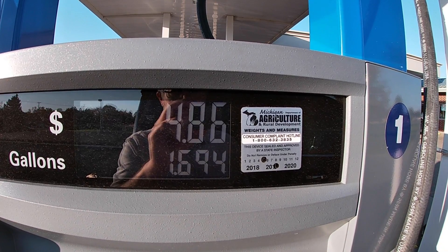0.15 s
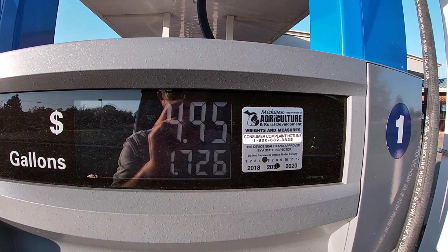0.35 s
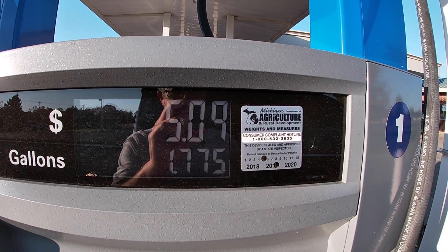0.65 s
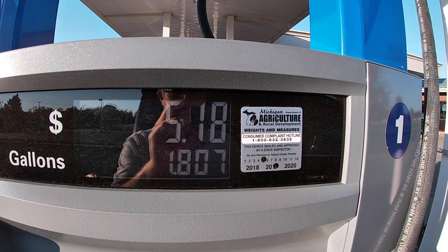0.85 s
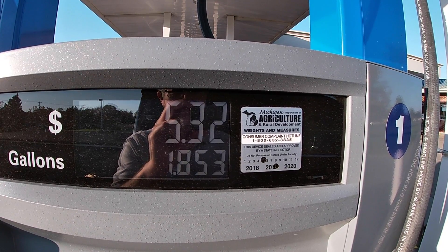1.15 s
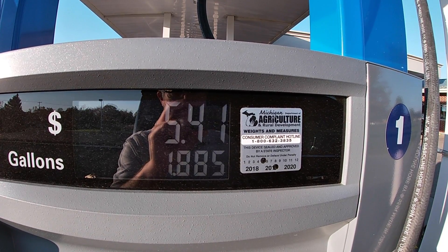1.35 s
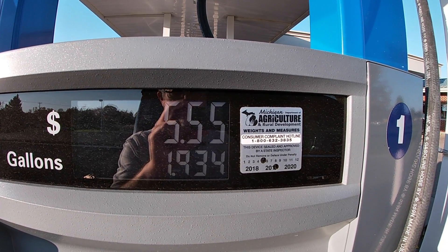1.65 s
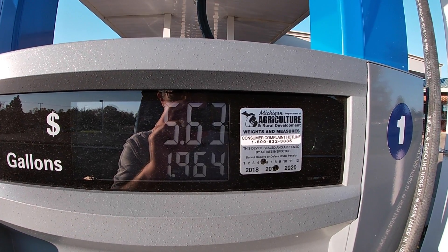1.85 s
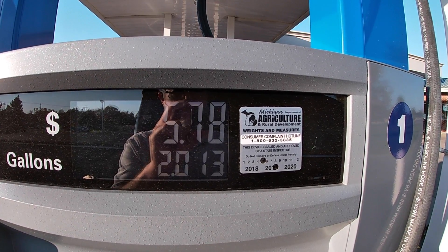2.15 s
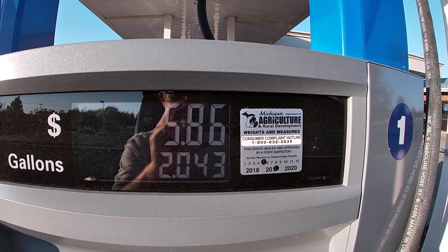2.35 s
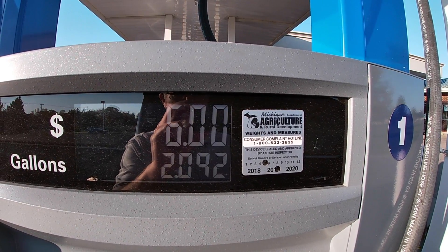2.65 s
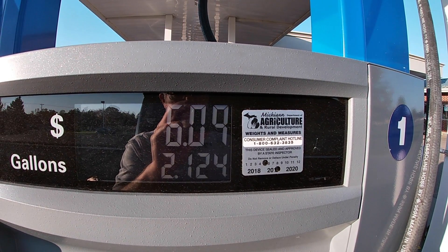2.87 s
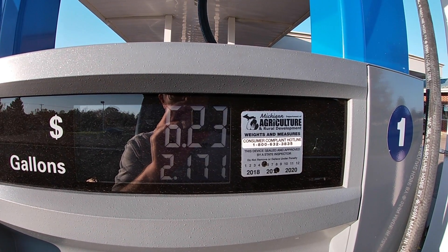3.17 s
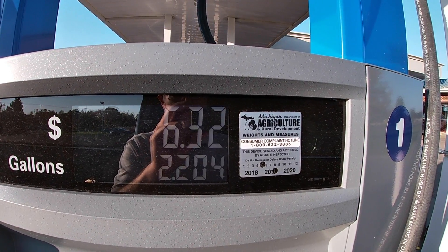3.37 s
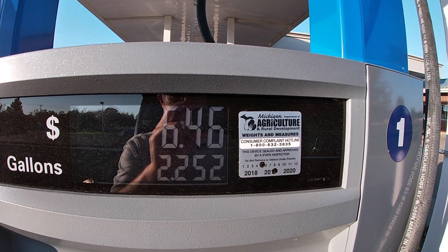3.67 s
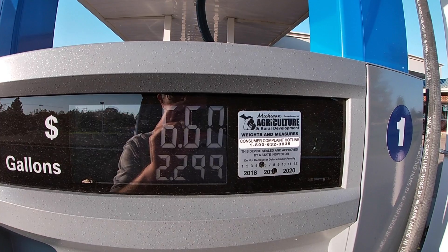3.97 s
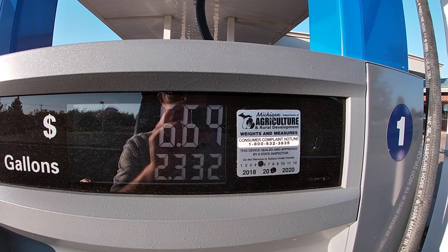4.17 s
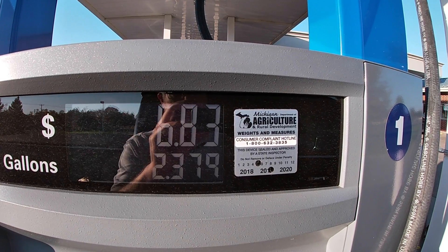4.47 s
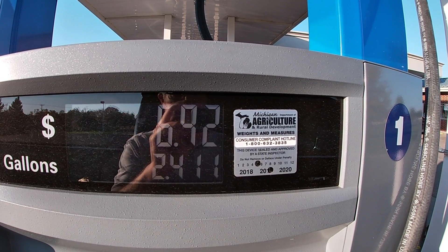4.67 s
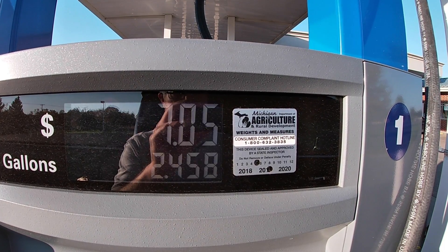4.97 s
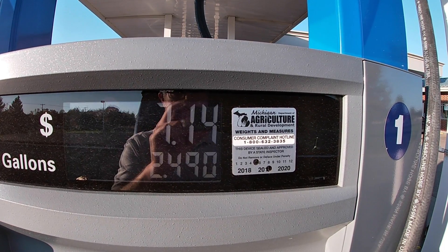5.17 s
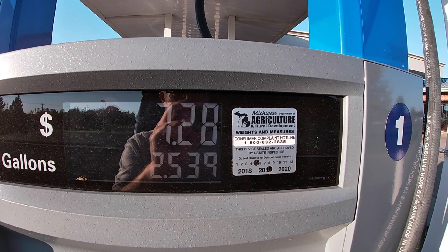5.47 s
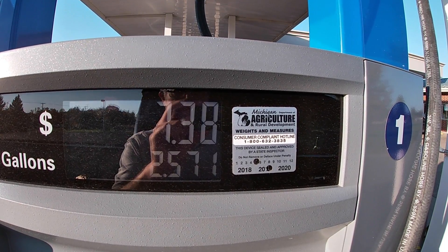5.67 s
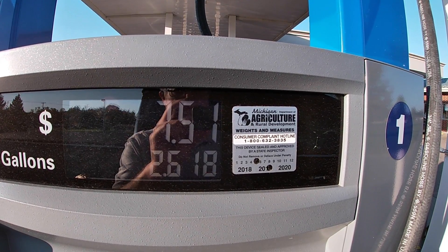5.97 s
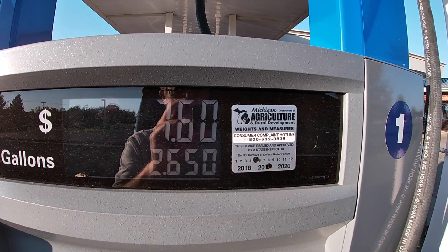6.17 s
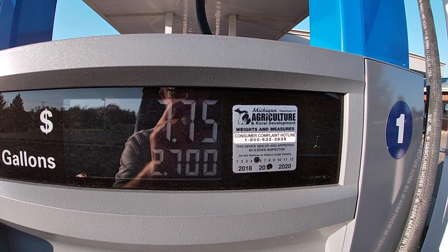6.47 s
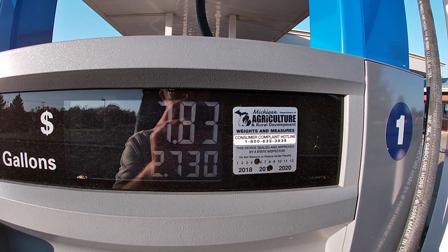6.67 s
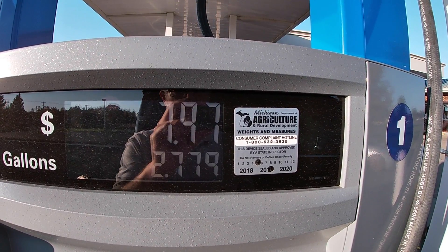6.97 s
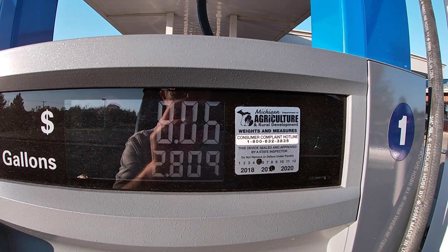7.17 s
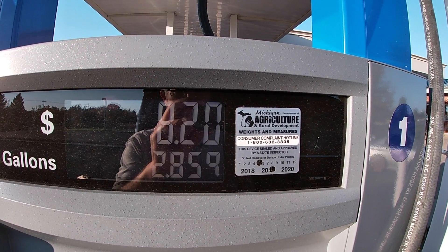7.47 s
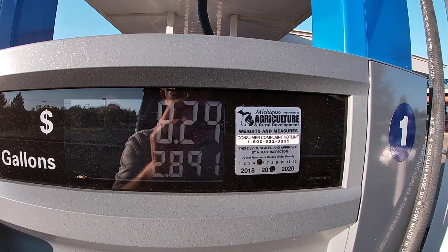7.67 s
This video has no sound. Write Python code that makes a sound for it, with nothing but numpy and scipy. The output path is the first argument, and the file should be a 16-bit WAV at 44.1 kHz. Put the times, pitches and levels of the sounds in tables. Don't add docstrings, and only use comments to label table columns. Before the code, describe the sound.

Outdoors at a filling station, a phone beside the pump picks up a deep, boomy engine hum that drops in pitch and turns lumpy as a big truck rolls closer. Road rumble and short gliding car hums sit behind it, with a low pump drone and soft fuel hiss. Dull knocks punctuate; a brief rev comes past the middle, and faint squeals and ticking valves arrive near the end.

```python
import sys
import numpy as np
from scipy import signal
from scipy.fft import rfft, irfft, next_fast_len
from scipy.io import wavfile
from scipy.ndimage import uniform_filter1d, minimum_filter1d

SR = 44100
rng = np.random.default_rng(int(sys.argv[2]) if len(sys.argv) > 2 else 0)


def amplitude_ratio(level_db):
    exponent = np.asarray(level_db, float) / 20
    return 10 ** exponent


def bounce(signal):
    frames = np.transpose(np.atleast_2d(signal))
    limited = np.clip(frames, -1, 1)
    pcm = np.round(limited * 32767).astype(np.int16)
    wavfile.write(sys.argv[1], SR, pcm)


N = 344844
ARRIVES_S = 7.8
LEVEL_S = 7.1
# t/s, level of background noise/dB (held down at first while the engine hum is loud), level of
# tyres passing close/dB
TRAFFIC = [(0, -3, -51), (.55, -4.5, -51), (.86, -4, -50.5), (1.03, -4, -45.5), (1.4, 0, -44),
           (1.7, -.5, -45.5), (2.1, 1.5, -43), (2.6, 1, -46.5), (3.2, -0.2, -46), (3.95, 1.9, -46.5),
           (4.15, -1.3, -45.5), (4.7, 0.9, -46.5), (5.05, 1, -48), (5.9, -1.8, -48), (6.6, -0.5, -47.5),
           (7.1, -0.3, -45.5), (7.5, 0.5, -42), (7.82, 1.5, -39)]


def level(x):
    return x / np.sqrt(np.mean(x ** 2))


def play(table):
    s, *columns = np.transpose(table)
    t = np.arange(N) / SR
    gate = np.clip(np.minimum(t - s[0] + .05, s[-1] + .05 - t) / .05, 0, 1)
    return gate, *(np.interp(t, s, c) for c in columns)


def walk(rate, size=N):
    k = int(SR / rate)
    held = np.repeat(rng.standard_normal(size // k + 2), 8)
    steps = uniform_filter1d(uniform_filter1d(held, size=8), size=8)
    return np.interp(np.arange(size) * 8 / k, np.arange(len(steps)), level(steps - steps.mean()))


def growth(far_db, gain_db, lateness, until=ARRIVES_S):
    return far_db + gain_db * np.minimum(np.arange(N) / SR / until, 1) ** lateness


def bumps(table):
    t = np.arange(N) / SR
    return sum(db * np.exp(-(2 * (t - s) / length) ** 2) for s, length, db in table)


def swell(voice, s, length, hz, glide, db, **kind):
    out, t = np.zeros(N), np.arange(N) / SR - s
    on = abs(t) < length
    fade_db = 10.5 * (2 * t[on] / length) ** 2
    out[on] = voice(hz + glide * t[on], db - fade_db, **kind)
    return out


def tone(hz, db, wobble, flutter_db, rate):
    pitch, strength = walk(rate)[:len(hz)], walk(rate)[:len(hz)]
    phase = 2 * np.pi * (np.cumsum(hz * (1 + wobble * pitch)) / SR + rng.random())
    return np.sqrt(2) * amplitude_ratio(db + flutter_db * strength) * np.sin(phase)


def whistle(hz, db, clean):
    phase = 2 * np.pi * np.cumsum(hz) / SR
    rate = .055 * hz.mean()
    in_phase = clean + walk(rate)[:len(hz)]
    return amplitude_ratio(db) * (in_phase * np.sin(phase) + walk(rate)[:len(hz)] * np.cos(phase))


def wash(spectrum, low_hz, high_hz, flicker_db, rate):
    size = next_fast_len(N)
    hz = np.arange(1, size // 2 + 2) * SR / size
    points = np.array(spectrum)
    gain = amplitude_ratio(np.interp(np.log(hz), np.log(points[:, 0]), points[:, 1], left=-90, right=-90))
    gain = gain / np.sqrt((1 + (low_hz / hz) ** 6) * (1 + (hz / high_hz) ** 6))
    noise = gain * rfft(rng.standard_normal(size))
    octaves = np.arange(np.floor(np.log2(points[0, 0])), np.log2(points[-1, 0]) + 1)
    share = [np.clip(1 - abs(np.log2(hz) - k), 0, 1) for k in octaves]
    return level(sum(amplitude_ratio(flicker_db * walk(rate)) * irfft(noise * w, size)[:N] for w in share))


def road():
    # f/Hz, level per Hz/dB
    rumble = [(12, -35), (22, -13), (43, -2), (65, 1), (82, -9), (100, -7), (138, -5.5), (175, -2.5),
              (215, -14.5), (252, -23.5), (310, -15.5), (400, -34.5), (520, -57)]
    roar = [(120, -31), (200, -2.5), (237, -3.5), (331, -16), (420, -14), (528, -17), (802, -16.5),
            (1140, -18.5), (1380, -22.5), (3500, -38), (4550, -72), (7700, -120)]
    _, flow_db, tyres_db = play(TRAFFIC)
    low = amplitude_ratio(1.24 * flow_db - 26.5) * wash(rumble, low_hz=36, high_hz=287, flicker_db=1.15, rate=5.5)
    far = amplitude_ratio(flow_db - 39.0) * wash(roar, low_hz=264, high_hz=1150, flicker_db=-0.9, rate=3.83)
    tyres = amplitude_ratio(tyres_db + 0.8) * wash(roar, low_hz=1260, high_hz=2560, flicker_db=0.85, rate=7.4)
    return low + far + tyres


def fuel_hiss():
    # f/Hz, level per Hz/dB
    hiss = [(880, -29.5), (1500, 1.5), (2090, -5.5), (2280, -10.5), (3100, -12.5), (5410, -21),
            (5870, -22.5), (7300, -25), (9000, -25.5), (11700, -54), (19800, -120)]
    _, flow_db, _ = play(TRAFFIC)
    hiss_db = growth(-54.5, 5, 10, LEVEL_S) + .8 * flow_db + 2.5
    return amplitude_ratio(hiss_db) * wash(hiss, low_hz=2400, high_hz=6400, flicker_db=1.0, rate=8.3)


def pump_drone():
    # t/s, f/Hz, level/dB
    drone = [
        (0, 36.1, -47.5),
        (2.2, 36, -43),
        (2.6, 34.73, -37),
        (3.4, 35.4, -32),
        (4.3, 35.27, -32),
        (5.5, 33.64, -33),
        (6.6, 34, -30.5),
        (7.82, 33.1, -32),
    ]
    return tone(*play(drone)[1:], wobble=0.0088, flutter_db=1.0, rate=6.3)


def cars():
    pulls = [(0.17, 0.33, 145, 5.5, -29), (1.17, .75, 120, 0, -27), (.68, .3, 126, -10, -32),
             (1.6, .35, 130, 29.5, -32.5), (2.05, 0.406, 117, 9.5, -31.5), (2.48, .35, 113, -0.5, -33),
             (2.7, 0.84, 126, 13.5, -33), (1.47, .35, 167, -4.5, -32.5), (1.92, .45, 170, 30, -31),
             (2.2, 0.18, 174, 9, -31.5), (1.9, .3, 197, 10.5, -36), (3.25, .45, 162, 45, -28.5),
             (4.1, .35, 118, 0, -29), (3.72, 0.453, 122, -9.5, -30), (3.97, 0.18, 300, -61, -39),
             (2.95, .25, 166, -1, -32.5), (3.65, .5, 150, -10, -34), (2.9, .35, 108, 8.5, -32.5),
             (5.4, 0.402, 150, 1.5, -32), (4.6, .6, 153, 9.5, -30), (5.05, .45, 149, 0.5, -29.5),
             (.18, 0.42, 162, -23, -31), (0.2, 0.24, 193, -1.5, -35.5), (0.12, 0.23, 280, 1, -41.5),
             (3.3, 0.449, 130, 45.5, -36.5), (0.86, .5, 168, -0.5, -42), (2.45, .5, 168, 0, -31),
             (1.7, 0.34, 245, -0.5, -40.5), (2.95, .4, 295, -0.5, -46), (8.5, .5, 230, -10, -37.5)]
    # t/s, f/Hz, level/dB
    rev = [
        (5.3, 145.3, -38),
        (5.42, 145.1, -21.5),
        (5.64, 148.2, -17.5),
        (5.82, 156.7, -19.5),
        (5.9, 157.5, -23),
        (6.06, 148.7, -20.5),
        (6.28, 145.3, -24),
        (6.45, 143.9, -36),
    ]
    passing = sum(swell(tone, *row, wobble=.014, flutter_db=1.4, rate=14) for row in pulls)
    gate, hz, db = play(rev)
    return passing + gate * tone(hz, db, wobble=.003, flutter_db=.3, rate=12)


def knocks():
    # t/s, peak level/dB, f/Hz, t60/s
    taps = [(.162, -54, 4700, .04), (.177, -53, 4920, .04), (0.575, -56, 4950, .04), (.588, -54, 4800, .04),
            (2.06, -37, 1390, .09), (2.075, -38, 1470, .12), (2.28, -41, 1420, .1), (1.64, -40, 1320, .1),
            (1.08, -52, 3700, .04), (.875, -51, 3540, 0.045), (2.351, -37.5, 1416, 0.12),
            (2.53, -61, 9010, 0.038), (3.893, -34, 1450, .07), (3.9, -40, 1750, 0.046),
            (3.95, -44, 378, 0.11), (4.19, -58, 8240, 0.082), (5.46, -70, 10940, 0.068),
            (5.575, -37, 440.7, 0.15), (5.779, -39, 448, 0.15), (6.089, -35, 466.6, 0.17),
            (6.5, -57, 9410, 0.07), (7.004, -49, 9400, .02), (7.003, -50, 9900, .02),
            (7.005, -58, 12300, .02), (7.639, -35, 436.5, 0.24), (7.64, -30, 274.8, 0.26)]
    out = np.zeros(N)
    t = np.arange(SR // 4) / SR
    attack = np.sin(np.pi / 2 * np.minimum(t / 0.002, 1)) ** 2
    for s, db, hz, t60 in taps:
        grit = 1 + .45 * walk(rate=150)[:len(t)]
        ring = amplitude_ratio(db - 60 * t / t60) * attack * grit * np.sin(2 * np.pi * hz * t)
        start = int(s * SR)
        out[start:start + len(t)] += ring[:N - start]
    return out


def turbo():
    # t/s, f/Hz, level/dB
    spin = [(5.44, 3260, -66), (5.52, 3350, -52), (5.565, 3430, -58), (5.61, 3520, -52), (5.69, 3620, -53),
            (5.76, 3690, -54), (5.81, 3650, -57.5), (5.88, 3600, -52), (5.98, 3600, -53), (6.1, 3700, -58),
            (6.15, 3760, -57), (6.21, 3830, -68)]
    gate, hz, db = play(spin)
    return gate * whistle(hz, db - 6.3 + .7 * walk(25), clean=2)


def brake_squeals():
    squeals = [(4.665, .08, 3170, 0, -60), (4.75, .08, 3190, 700, -64), (4.89, .06, 3600, 3500, -64),
               (5.12, .08, 2950, 500, -62), (5.25, .06, 3000, 0, -64), (6.7, .2, 1135, -100, -55),
               (7.34, .16, 1115, 250, -51), (7.41, .1, 1130, 0, -52), (7.465, .06, 1095, 0, -49),
               (7.51, .11, 1190, 100, -47.5), (7.58, .13, 1203, 0, -45.5), (7.535, .06, 1100, 0, -52),
               (7.66, .07, 1185, 0, -44), (7.71, .08, 1160, -900, -47), (7.79, .09, 1195, 0, -49),
               (7.655, .08, 1010, 0, -54)]
    return .55 * sum(swell(whistle, *row, clean=3.2) for row in squeals)


def valve_clatter(phase):
    # f/Hz, level per Hz/dB
    clatter = [(4000, -24), (5500, 0.5), (7200, -6.5), (9400, -2.5), (9800, -6.5), (10100, -13.5),
               (10900, -13), (11200, -21), (12000, -17.5), (12700, -18.5), (13100, -25), (13600, -28.5),
               (14200, -30), (15000, -30.5), (15300, -72)]
    # t/s, length/s, gain on the clatter/dB
    puffs = [(2.53, .04, 4), (2.97, .04, 7), (4.2, .08, 4), (5.47, 0.064, 4), (6.25, .04, 2), (6.5, .08, 2),
             (6.75, .05, 3), (6.86, .05, 0), (7.01, .05, 5), (7.12, .08, 2), (7.29, .07, 1.5),
             (7.53, .08, -0.5), (.44, .03, 4), (7.78, 0.067, 6.5)]
    _, flow_db, _ = play(TRAFFIC)
    opening_db = -5.5 * np.clip(1 - np.arange(N) / SR / 1.1, 0, 1) ** .5
    clatter_db = growth(-73, 12.2, 8, LEVEL_S) - 2.0 + opening_db
    clatter_db = clatter_db + .3 * flow_db + .4 * walk(8.4) + bumps(puffs)
    near = np.clip((clatter_db + 65.0) / 10, 0, 1)
    tick_db = 1.8 * np.cos(phase / 4) + 1.4 * np.cos(phase / 2 + 1.3) + 1.8 * walk(300)
    noise = wash(clatter, low_hz=6500, high_hz=30000, flicker_db=.5, rate=9)
    return amplitude_ratio(clatter_db + 4.0) * amplitude_ratio(near * tick_db) * noise


def truck():
    # t/s, firing f/Hz, firing hum level/dB
    firing = [(0, 68.16, -14.5), (.25, 65.93, -16), (.4, 65.3, -18), (.58, 63.4, -16.5), (.86, 61.2, -20.5),
              (1.0, 60, -27), (1.12, 60.2, -31), (1.24, 59.4, -19), (1.38, 57.88, -29),
              (1.52, 57.16, -24.5), (1.75, 56.9, -25.5), (2.1, 55.93, -21.5), (2.8, 53.83, -21),
              (3.7, 52.17, -22), (4.4, 50.97, -21), (5.3, 49.67, -21), (6.3, 48.49, -23),
              (7.82, 45.56, -21.5)]
    cycle = [(0.25, -28.5), (0.5, -10.5), (0.75, -18), (1, 0), (1.25, -3.5), (1.5, -2), (1.75, -7),
             (2, 1.5), (2.25, -7.5), (2.5, -3.5), (2.75, -8), (3, -4.5), (3.25, -23), (3.5, -16),
             (3.75, -9), (4, -12), (4.25, -25), (4.5, -31), (5, -22.5), (5.25, -25), (5.75, -27.5),
             (6, -25.5), (6.25, -25.5), (6.5, -33.5), (6.75, -30.5), (7.25, -31.5), (8.5, -25), (8.75, -29),
             (9, -32), (9.5, -35)]
    # t/s, length/s, depth/dB
    hum_gaps = [(.45, 0.056, 3), (.94, 0.041, 8), (1.74, 0.029, 10), (2.3, .12, 8), (2.66, 0.099, 8),
                (3.05, 0.048, 5), (3.38, 0.059, 7), (3.57, 0.042, 3), (3.75, 0.054, 4), (4.33, 0.053, 14),
                (4.46, 0.045, 6), (4.66, 0.041, 16), (5.05, 0.049, 4), (6.95, 0.039, 5)]
    _, hz, hum_db = play(firing)
    t = np.arange(N) / SR
    waver = 2.2 * np.clip(1 - t / ARRIVES_S, .25, 1)
    octave_db = growth(-38, 20, 2.46) + waver * walk(4)
    uneven_db = growth(-41.5, 24.5, 6.6) + waver * walk(4)
    throb_db = growth(-44, 20.7, 1.35) + waver * walk(4)
    hum_db = hum_db + 1.1 * walk(8) - bumps(hum_gaps)
    lug_db = 8 * np.clip((t - 6.9) / .1 + .5, 0, 1) - 4
    phase = 2 * np.pi * np.cumsum(hz * (1 + .003 * walk(9) + .006 * walk(4))) / SR
    out = 0
    for k, db in cycle:
        if k == 1:
            group_db = hum_db
        elif k == 2:
            group_db = octave_db
        elif k < 2 or k > 4.3:
            group_db = uneven_db - 0.5
        else:
            group_db = throb_db + 2.0
        waver_db = .9 * walk(7) + (lug_db if k in (1.5, 2.5, 5) else 0)
        out = out + amplitude_ratio(db + group_db + waver_db) * np.sin(k * phase + 2 * np.pi * rng.random())
    return np.sqrt(2) * out, phase


def scene():
    engine, phase = truck()
    forecourt = road() + fuel_hiss() + pump_drone() + cars() + knocks()
    return (forecourt + turbo() + brake_squeals() + valve_clatter(phase) + engine)[None]


def limit(x):
    room = np.minimum(.385 / (abs(x) + 1e-9), 1)
    return x * uniform_filter1d(minimum_filter1d(room, size=1800), size=1800)


def starve(x):
    edges = [10300, 10600, 11200, 11600, 12000, 12400, 12800, 13500, 13900, 14300, 14900, 22100]
    gate_db = -106.5
    hz, _, frames = signal.stft(x, SR, nperseg=1024, boundary="even")
    kept = False
    for high, low in zip(edges[::-1], edges[-2::-1]):
        band = (hz >= low) & (hz < high)
        loudness = np.sqrt(np.mean(abs(frames[band]) ** 2, axis=0))
        kept = kept | (loudness > amplitude_ratio(gate_db))
        frames[band] *= kept
    return signal.istft(frames, SR, nperseg=1024)[1][:N]


def low_pass(x):
    return signal.sosfilt(signal.butter(12, 15100, fs=SR, output="sos"), x)


def record(dry):
    mix = starve(limit(dry[0]))[None]
    return low_pass(mix)


dry = scene()
out = record(dry)
bounce(out)
```